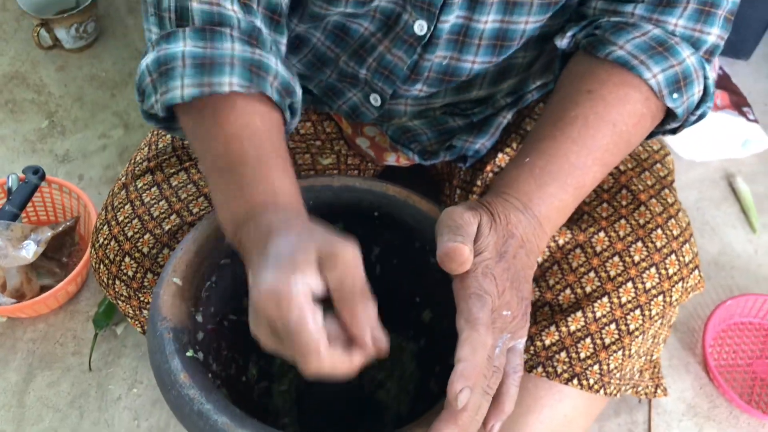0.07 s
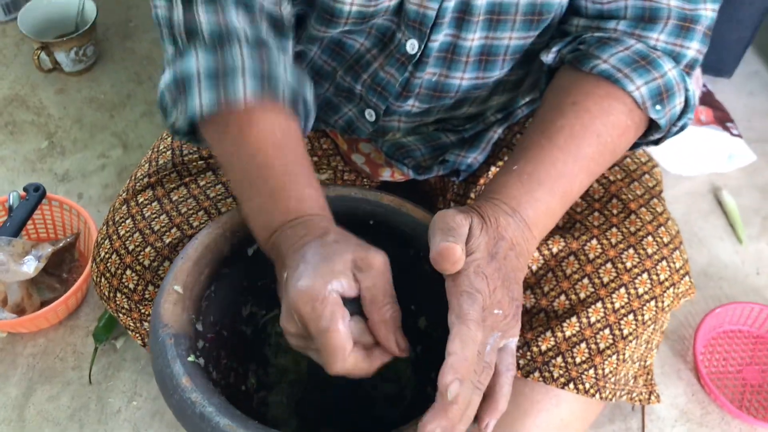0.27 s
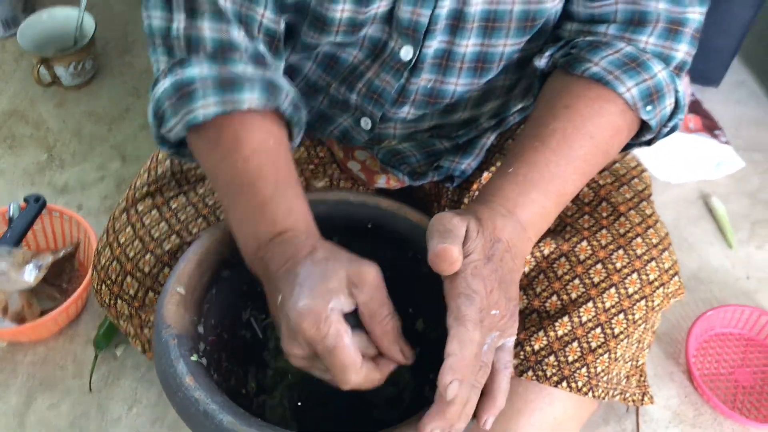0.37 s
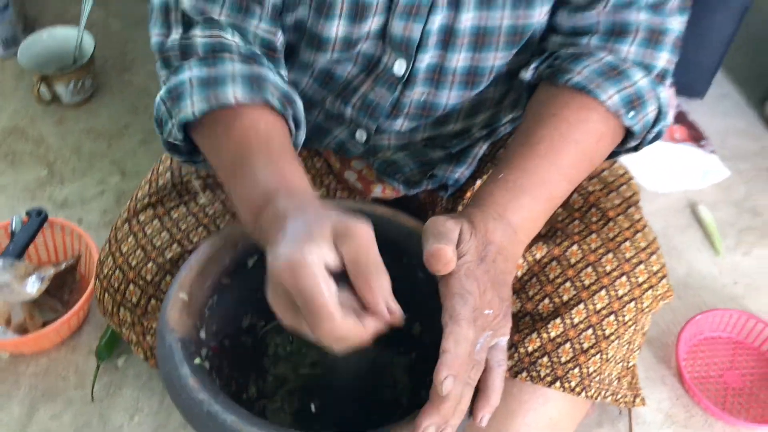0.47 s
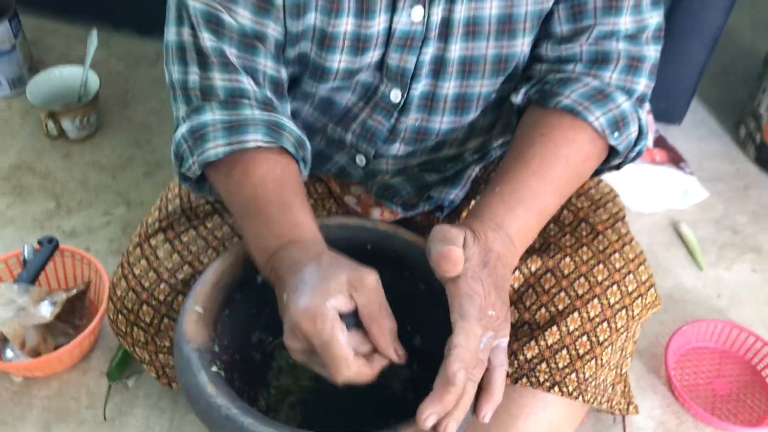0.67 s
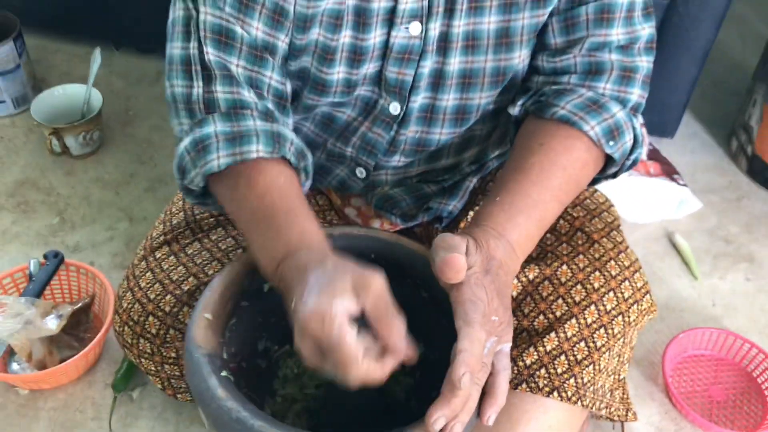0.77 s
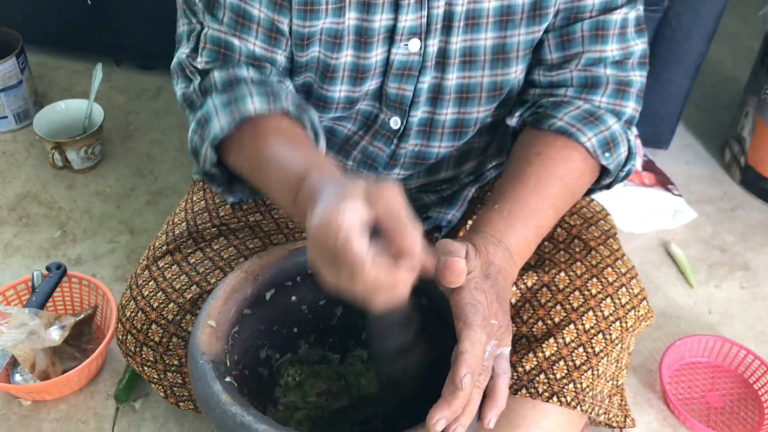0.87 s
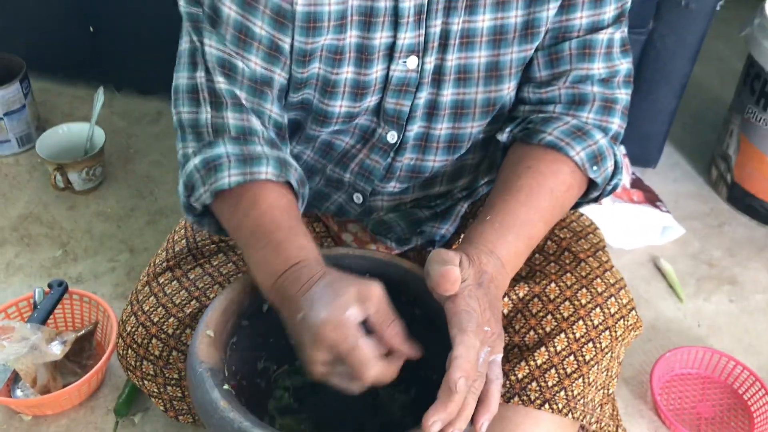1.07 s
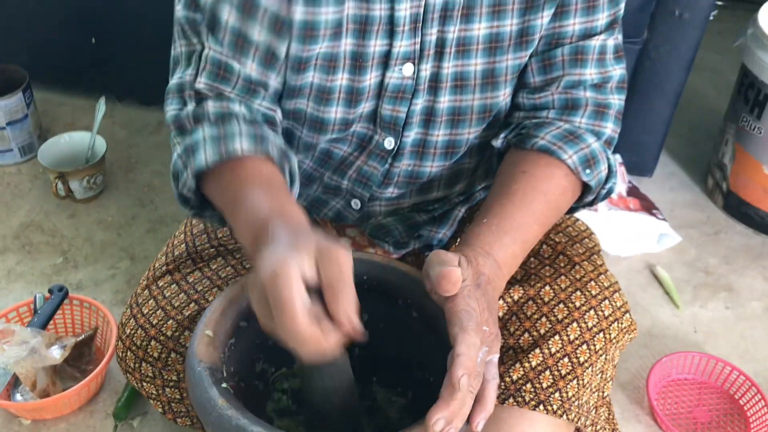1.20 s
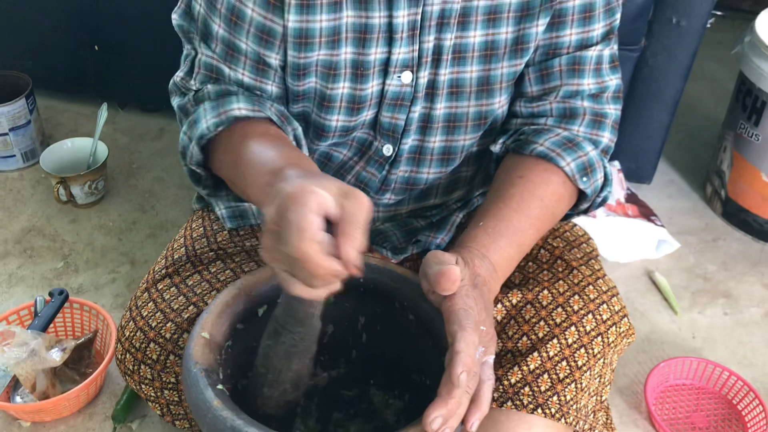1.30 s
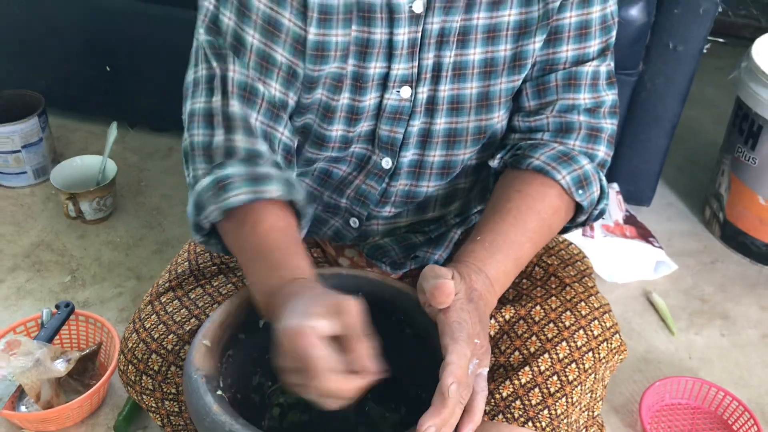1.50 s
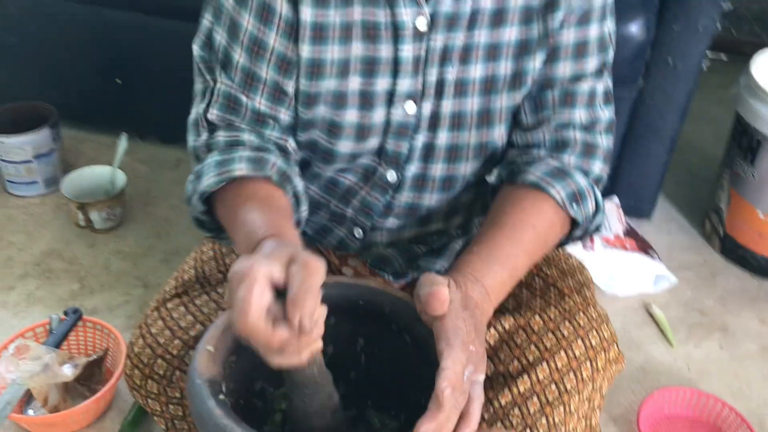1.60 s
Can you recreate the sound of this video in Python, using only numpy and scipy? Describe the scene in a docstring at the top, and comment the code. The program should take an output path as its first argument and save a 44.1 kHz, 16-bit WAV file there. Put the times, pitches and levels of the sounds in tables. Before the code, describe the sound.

Pestle knocking inside a clay mortar, briefly ringing, with soft wet squishes of paste.

```python
"""A quiet room, close to a clay mortar in which a pestle pounds wet herbs.
The pestle clacks against the wall, which rings, slides down and lands in the paste with a hollow thud.
The paste squelches under each blow and smacks as the pestle lifts: fibres and small bubbles burst.
Near surfaces and the room add short reflections, over a faint low noise."""
import sys
import numpy as np
from scipy import signal
from scipy.fft import rfft, irfft
from scipy.io import wavfile

SR = 44100
rng = np.random.default_rng(int(sys.argv[2]) if len(sys.argv) > 2 else 0)


def output_pcm(signal):
    """Save a mono or channel-first signal as 16-bit PCM at the path in sys.argv[1].

    Samples are clipped to [-1, 1] before scaling.
    """
    pcm = np.clip(np.atleast_2d(signal).T, -1, 1) * 32767
    wavfile.write(sys.argv[1], SR, np.round(pcm).astype(np.int16))


N = 72765
LEAD_S, TOP_HZ = 0.2, 15900

# Modes of pestle and wall in contact. Each row: frequency in Hz, level in dB, T60 in seconds.
CLACK_MODES = [(665, -19, 0.018), (1667, -40.5, 0.032), (1883, -18.5, .018), (3197, -16.5, 0.019),
               (3465, -13, .036), (4720, -27.5, 0.041)]
# Free wall modes above the lowest. Each row: frequency in Hz, level in dB, T60 in seconds.
WALL_MODES = [(1325, -18, 0.29), (1912, -28.5, .1), (3330, -14.5, 0.061), (3610, -23.5, 0.057),
              (4765, -28, .12)]
# Modes of the bowl's hollow and its seat. Each row: frequency in Hz, level in dB, T60 in seconds.
HOLLOW_MODES = [(179, -17.5, 0.18), (250, -15, .14), (283, -9, .15), (319, -13, 0.2014), (448.6, 0, 0.16),
                (481, -8.5, 0.069), (579, -12.5, 0.12), (766, -10.5, 0.088)]
# Crunch spectrum. Each row: frequency in Hz, density in dB.
CRUNCH_SPECTRUM = [(150, -8.5), (300, -15.5), (650, -2.5), (1000, -3.5), (1400, 3.5), (2000, 2),
                   (2350, -19), (4000, -25), (7000, -34.5), (16000, -43.5)]
# Each row: start in seconds, clack level in dB, hardness cutoff in Hz, clack pitch in Hz,
# clink level in dB, ring level in dB, ring pitch in Hz, ring rise in seconds,
# time until damped in seconds, hollow level in dB, crunch level in dB.
KNOCKS = [(-.1, -35, 2040, 1290, -68, -41, 1239, 0.0043, 0.11, -48, -51),
          (.2132, -9.5, 3220, 1305, -41, -25.5, 1242, 0.038, 0.1074, -34, -22),
          (0.892, -25.5, 2267, 1216, -55.5, -35.5, 1238, 0.0035, 0.025, -45.5, -34),
          (1.3373, -18, 1500, 1186, -50, -30.5, 1229, 0.012, 0.057, -35, -29.5)]


def knock(clack_db, hard_hz, clack_hz, clink_db, ring_db, ring_hz, rise_s, free_s, hollow_db, crunch_db):
    """A short, gritty clack; the wall rings on until the sinking pestle damps it."""
    contact_s, damp_db, damp_s = 0.0007, -9.5, 0.0034
    t = np.arange(SR // 2) / SR
    clack = rising(t, 0.00071) * mode(clack_hz, t60_s=0.028) + ring(CLACK_MODES, hard_hz)
    clink = amp(clink_db) * mode(hz=5510, t60_s=0.028)
    damping = amp(damp_db * (1 + np.tanh((t - free_s) / damp_s)) / 2)
    wall = rising(t, rise_s) * damping * (mode(ring_hz, t60_s=0.35) + ring(WALL_MODES, hard_hz))
    hollow = amp(hollow_db) * ring(HOLLOW_MODES)
    crunch = amp(crunch_db) * dying(t, t60_s=0.027) * noise(len(t), CRUNCH_SPECTRUM)
    return rising(t, contact_s) * (amp(clack_db) * clack + clink + amp(ring_db) * wall + hollow + crunch)


# Dull rush of displaced paste. Each row: frequency in Hz, density in dB.
MUSH_SPECTRUM = [(150, -15), (310, -3), (380, 0), (445, 0), (540, -8), (760, -8), (1250, -10), (1800, -36),
                 (5000, -41)]
# Each row: start in seconds, level in dB, softness cutoff in Hz.
THUDS = [(.271, -42, 900), (.303, -51, 430), (0.6135, -50.5, 794), (0.666, -40.5, 980), (0.985, -50, 513)]


def thud(level_db, soft_hz):
    """The cushioned blow pushes the air in the bowl and shoves the paste aside."""
    push_hz, push_db, push_t60_s = 670, 4, 0.023
    t = np.arange(SR // 2) / SR
    air = ring(HOLLOW_MODES + [(push_hz, push_db, push_t60_s)], soft_hz)
    mush = amp(-7) * dying(t, t60_s=0.19) * noise(len(t), MUSH_SPECTRUM)
    return amp(level_db) * (air + mush)


# Wet paste spectrum. Each row: frequency in Hz, gain in dB.
PASTE_SPECTRUM = [(200, -8), (800, -16), (1400, 6.5), (2400, 2.5), (4000, 0.5), (6500, -2), (10000, -8),
                  (12000, -3.5), (15000, -7), (16000, 2)]
# Each row: centre in seconds, half length in seconds, level in dB, tilt in dB per octave,
# air pocket resonance in Hz.
SQUELCHES = [(.2155, 0.0023, -62, 10.5, 12500), (.231, 0.001, -56.5, 13, 14600),
             (.266, 0.0046, -54.5, 1, 14400), (.2703, 0.00039, -48, 9, 6800), (.296, 0.005, -49, -1, 6500),
             (.3052, .0016, -42, 0, 3560), (.424, 0.0022, -58, -5, 3500), (.559, 0.0011, -58, 1.5, 12330),
             (.626, 0.0046, -56.5, -1.5, 4840), (.6325, 0.003, -52, 1.5, 4160),
             (.645, 0.018, -63, 2.5, 5260), (.659, 0.0033, -49, 2, 8600), (.6655, 0.0014, -47, 0, 2220),
             (.771, 0.0014, -57.5, -4.5, 6360), (.893, 0.00058, -59.5, 9.5, 13500),
             (.982, 0.0087, -59, 4.5, 13200), (1.0052, 0.0014, -48.5, 2, 5150),
             (1.0135, 0.0027, -52, 2.5, 9500), (1.03, 0.021, -65, 1, 9160),
             (1.058, 0.0045, -54.5, 0.5, 4000), (1.1455, 0.0019, -49, -2, 2350),
             (1.17, .012, -65, -4.5, 2500), (1.3398, 0.0012, -39, 15.5, 11600),
             (1.3723, 0.0017, -48, -13.5, 3800), (1.382, 0.0092, -65, 3, 5370),
             (1.421, 0.0021, -45.5, 0, 3500), (1.425, 0.016, -61, 1, 3270), (1.512, 0.0035, -55, -3, 2450),
             (1.527, 0.0049, -51, -6, 1430)]


def squelch(half_s, level_db, tilt_db_per_octave, pocket_hz):
    """Fibres and small bubbles burst in a clump, coloured by the air pocket under the pestle."""
    pocket_db, pocket_octaves = 7, 0.35
    clicks, envelope = grains(half_s)
    hz = np.geomspace(100, TOP_HZ, 100)
    resonance_db = pocket_db * np.exp(-(np.log2(hz / pocket_hz) / pocket_octaves) ** 2)
    spectrum = np.transpose([hz, value_at(PASTE_SPECTRUM, hz) + resonance_db])
    clump = envelope * colour(pops(clicks), spectrum, tilt_db_per_octave)
    return amp(level_db) * unit(clump) * rms(envelope)


def pops(clicks, count=32, decay_cycles=2.1):
    """Each click bursts as a few cycles at a random pitch; together they are about white."""
    t = np.arange(SR // 100) / SR
    pitches_hz = np.linspace(np.sqrt(700), np.sqrt(TOP_HZ), count) ** 2
    pick = rng.integers(0, count, len(clicks))
    out = np.zeros(len(clicks))
    for k, hz in enumerate(pitches_hz):
        pop = np.sin(2 * np.pi * hz * t) * np.exp(-hz * t / decay_cycles) * hz ** 0.75
        out += excite(clicks * (pick == k), pop)
    return out


# Each row: centre in seconds, half length in seconds, wall level in dB, hollow level in dB.
SLIDES = [(.266, 0.018, -49.5, -55), (.62, 0.018, -57, -52.5), (.983, 0.0063, -47.5, -58)]


def slide(half_s, wall_db, hollow_db):
    """Grit under the pestle excites the damped wall and the hollow, which rings on."""
    lowest_hz, t60_s = 1245, 0.061
    clicks, envelope = grains(half_s)
    damped_modes = [(lowest_hz, 0, t60_s)] + [(hz, db, t60_s) for hz, db, _ in WALL_MODES]
    rub = envelope * unit(excite(clicks, ring(damped_modes, cutoff_hz=2500)))
    hum = rms(envelope) * unit(excite(clicks * envelope, ring(HOLLOW_MODES, cutoff_hz=900)))
    return amp(wall_db) * rub + amp(hollow_db) * hum


def grains(half_s, rate_per_s=6000, spread_db=4.5):
    """Tiny random clicks and, separately, an envelope that swells and fades."""
    t = np.arange(-SR // 8, SR // 8) / SR
    chance, size_draw, sign_draw = rng.random((3, len(t)))
    size = amp(spread_db * np.minimum(-np.log(size_draw + 1e-9), 4))
    clicks = (chance < rate_per_s / SR) * size * np.sign(sign_draw - 0.5)
    envelope = 1 / np.cosh(np.minimum(abs(t / half_s), 20))
    return clicks, envelope


# Each row: start in seconds, level in dB.
TICKS = [(0.5594, -56)]


def tick(level_db):
    """A glancing touch on the upper wall sounds one high note of the clay."""
    return amp(level_db) * mode(hz=3500, t60_s=0.058)


# Each row: delay in seconds, linear gain.
ECHOES = [(.0024, -0.013), (.0086, -.2), (0.0147, .15)]


def near_echoes(x):
    """First reflections from bowl, body and floor."""
    n = np.arange(len(x))
    return sum(gain * np.interp(n - delay_s * SR, n, x, left=0) for delay_s, gain in ECHOES)


# Each row: frequency in Hz, T60 in seconds.
ROOM_DECAY = [(100, 0.45), (400, 0.52), (1200, 0.25), (4000, 0.26), (16000, 0.3)]


def room(x):
    """A short diffuse tail, each band dying at its own rate."""
    hz, t, bands = signal.stft(rng.standard_normal(SR // 2), SR, nperseg=256)
    decay = dying(t, value_at(ROOM_DECAY, hz)[:, None])
    _, tail = signal.istft(bands * decay, SR, nperseg=256)
    tail[:SR // 200] = 0  # 5 ms pre-delay
    return excite(x, tail / np.linalg.norm(tail))


# Each row: frequency in Hz, density in dB.
BACKGROUND_SPECTRUM = [(15, -40.5), (25, -8.5), (87, -2.5), (373, -14), (659, -16), (840, -18.5),
                       (1260, -15.5), (1480, -19.5), (1890, -22), (4740, -29.5), (5430, -28.5), (6210, -32),
                       (16000, -36.5)]


def background():
    """Faint steady noise, mostly bass."""
    return amp(-68.5) * noise(N, BACKGROUND_SPECTRUM)


def amp(db):
    return 10 ** (np.asarray(db) / 20)


def rms(x):
    return np.sqrt(np.mean(x ** 2) + 1e-20)


def unit(x):
    return x / rms(x)


def rising(t, rise_s):
    return 1 - np.exp(-t / rise_s)


def dying(t, t60_s):
    return amp(-60 * t / t60_s)


def mode(hz, t60_s):
    t = np.arange(SR // 2) / SR
    return dying(t, t60_s) * np.sin(2 * np.pi * hz * t)


def ring(modes, cutoff_hz=np.inf):
    """Sum of modes; a soft contact weakens those above the cutoff."""
    return sum(amp(db) * mode(hz, t60_s) / np.hypot(1, (hz / cutoff_hz) ** 2) for hz, db, t60_s in modes)


def excite(x, response):
    return signal.fftconvolve(x, response)[:len(x)]


def value_at(points, hz):
    """Interpolates on a log-frequency axis."""
    points_hz, values = np.transpose(points)
    return np.interp(np.log(hz + 1), np.log(points_hz), values)


def colour(x, spectrum, tilt_db_per_octave=0, pivot_hz=4000):
    """Filters x by a tilted spectrum; output at rms 1."""
    hz = np.fft.rfftfreq(len(x), 1 / SR)
    octaves = np.log2(np.maximum(hz, SR / 64) / pivot_hz)
    gain = amp(value_at(spectrum, hz) + tilt_db_per_octave * octaves)
    return unit(irfft(rfft(x) * gain, len(x)))


def noise(samples, spectrum):
    return colour(rng.standard_normal(samples), spectrum)


def add(track, start_s, sound):
    """Mixes a sound into a track that begins LEAD_S early."""
    start = max(round((start_s + LEAD_S) * SR), 0)
    part = track[start:start + len(sound)]
    part += sound[:len(part)]


def scene():
    """Clay and paste in the room; the small bowl radiates no deep bass."""
    clay_send_db, paste_send_db, bass_cut_hz = -14.5, -14, 220
    lead = round(LEAD_S * SR)
    clay, paste = np.zeros((2, lead + N))
    room_tone = background()
    for table, source in ((KNOCKS, knock), (THUDS, thud), (TICKS, tick)):
        for start_s, *row in table:
            add(clay, start_s, source(*row))
    for table, source in ((SLIDES, slide), (SQUELCHES, squelch)):
        for centre_s, *row in table:
            sound = source(*row)
            add(paste, centre_s - len(sound) / SR / 2, sound)
    reverb = room(amp(clay_send_db) * clay + amp(paste_send_db) * paste)
    highpass = signal.butter(3, bass_cut_hz, "high", fs=SR, output="sos")
    mix = signal.sosfilt(highpass, clay + near_echoes(clay) + paste + reverb)
    return (mix[lead:] + room_tone)[None]


def record(dry):
    """Steep low-pass at TOP_HZ."""
    lowpass = signal.firwin(511, TOP_HZ, window=("kaiser", 9), fs=SR)
    return signal.oaconvolve(dry, lowpass[None], "same")


dry = scene()
out = record(dry)
output_pcm(out)
```